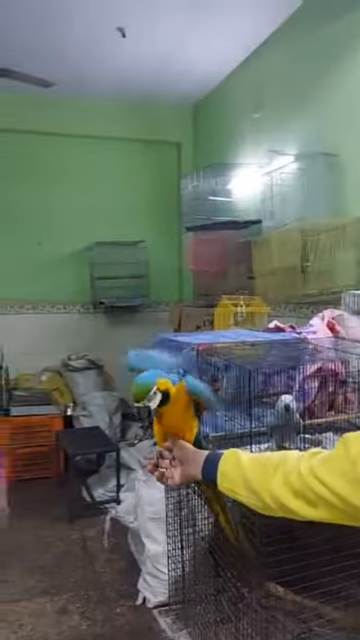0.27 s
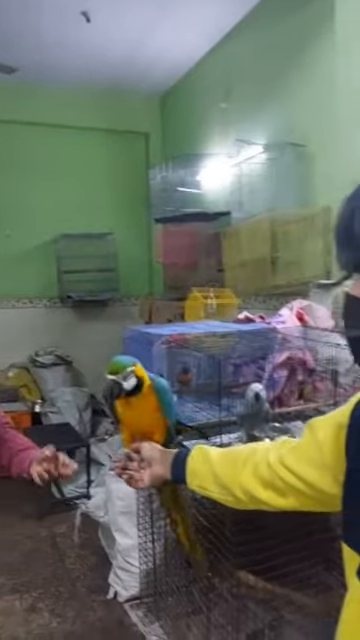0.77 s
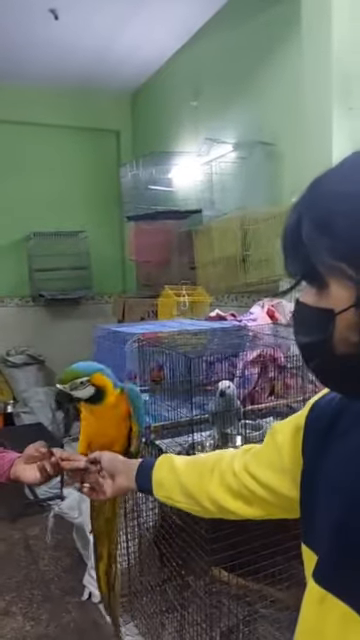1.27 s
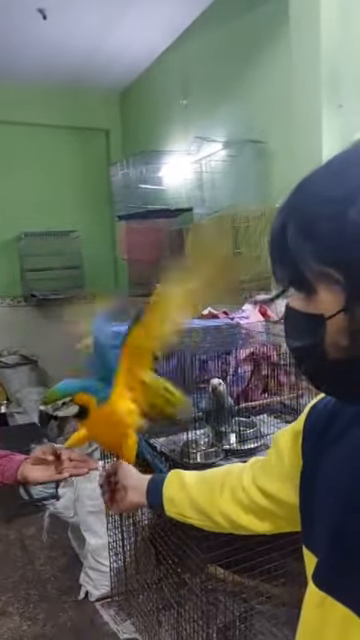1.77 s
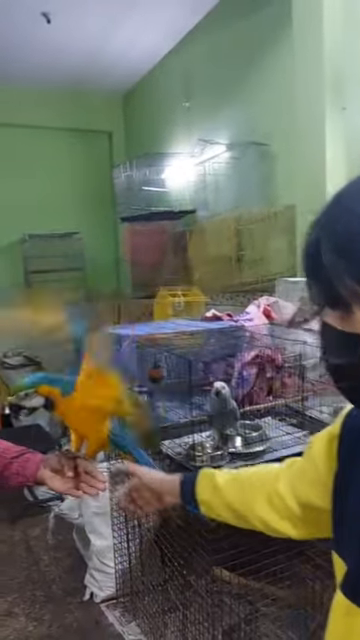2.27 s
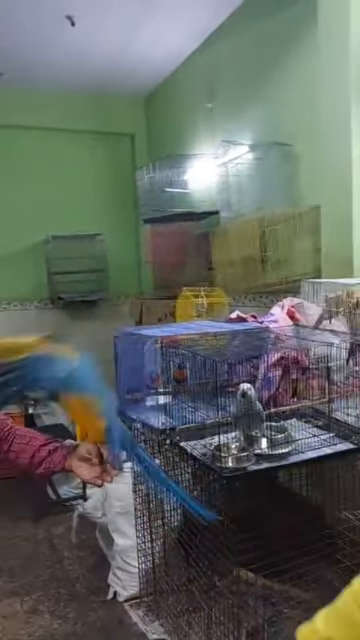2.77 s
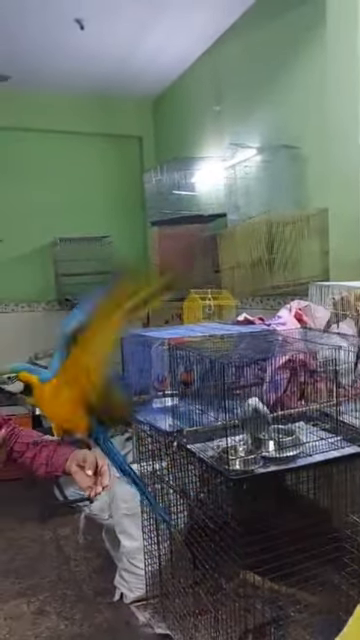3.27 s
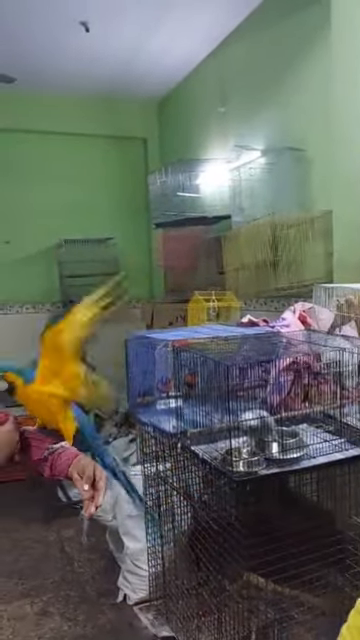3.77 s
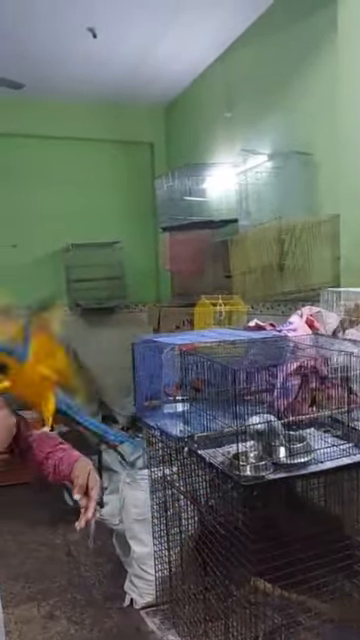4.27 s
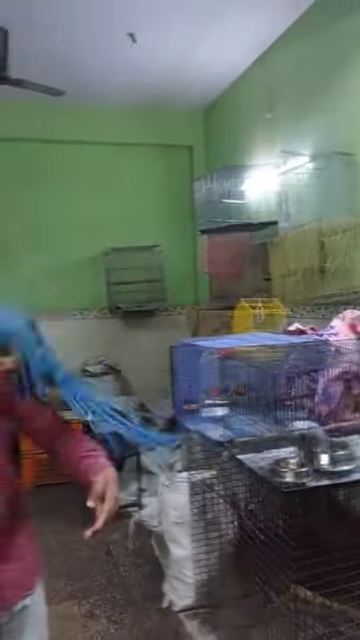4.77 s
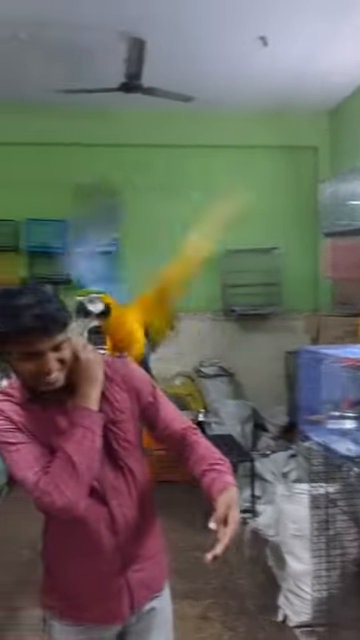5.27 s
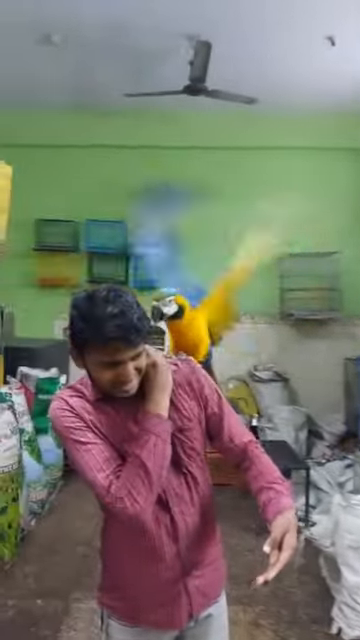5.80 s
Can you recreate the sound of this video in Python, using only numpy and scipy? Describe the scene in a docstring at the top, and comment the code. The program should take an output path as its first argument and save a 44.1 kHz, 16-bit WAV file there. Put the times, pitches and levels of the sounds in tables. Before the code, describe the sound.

A macaw rasps, screeches and squawks between bursts of wing flapping in an echoing shop with a low hum.

```python
"""Over the hum of a hard-walled shop a macaw rasps twice, beats its wings once and screeches twice,
the membranes of its syrinx gliding up in pitch and breaking into irregular vibration. A whine sinks
and frays as the beak closes. The bird then gives a crackling chirp and flaps from hand to shoulder,
each stroke displacing air in a low whoosh with a swish of feathers; claws and cage tick. Last come
runs of squawks over a second bout of flapping, all prolonged by the reverberation of the room."""
import sys
import numpy as np
from scipy import signal
from scipy.fft import rfft, irfft, next_fast_len
from scipy.io import wavfile
from scipy.ndimage import uniform_filter1d

SR = 44100
rng = np.random.default_rng(int(sys.argv[2]) if len(sys.argv) > 2 else 0)


def generate_wav(sig):
    """Save sig (samples, or channels by samples) to the path in sys.argv[1] as 16-bit PCM at SR."""
    pcm = np.round(np.clip(np.atleast_2d(sig).T, -1, 1) * 32767).astype(np.int16)
    wavfile.write(sys.argv[1], SR, pcm)


N = 266143
TIME = np.arange(N) / SR


def gain_of(db):
    return 10 ** (np.asarray(db) / 20)


def unit_rms(x):
    return x / np.sqrt(np.mean(x ** 2) + 1e-20)


def at_frequency(points, hz):
    f, value = np.transpose(points)
    return np.interp(np.log(hz + 1), np.log(f + 1), value)


def add(mix, start, sound):
    part = mix[max(round(start * SR), 0):][:len(sound)]
    part += sound[:len(part)]


def ramp(t, start, end):
    return np.clip((t - start) / max(end - start, 1 / SR), 0, 1)


def swell(centre, db, sigma, t=TIME):
    return gain_of(db) * np.exp(-.5 * ((t - centre) / sigma) ** 2)


def filtered(x, spectrum):
    """Spectral shaping by (f/Hz, level/dB) points, with a roll-off beyond either end."""
    size = next_fast_len(len(x) + 1024)
    hz = np.fft.rfftfreq(size, 1 / SR)
    low_cut = 1 + (spectrum[0][0] / (hz + 1)) ** 4
    high_cut = 1 + (hz / spectrum[-1][0] / 2) ** 4
    response = gain_of(at_frequency(spectrum, hz)) / np.sqrt(low_cut * high_cut)
    return irfft(rfft(x, size) * response, size)[:len(x)]


def noise(spectrum):
    return unit_rms(filtered(rng.standard_normal(N), spectrum))


def wobble(size, hz):
    """Low-pass noise of unit RMS, for random modulation up to about hz."""
    f = np.fft.rfftfreq(SR, 1 / SR)
    return unit_rms(irfft(rfft(rng.standard_normal(SR)) / np.sqrt(1 + (f / hz) ** 4), SR)[:size])


# Spectrum of fans and street (f/Hz, level/dB), and its overall level
HUM, HUM_DB = [(25, -14), (60, -7), (90, 2), (130, -1), (200, -12), (380, -9), (700, -17.5),
               (1200, -23.5)], -54
# Spectrum of the hiss (f/Hz, level/dB), and its rise (t/s, level/dB)
HISS, HISS_RISE = ([(400, 0), (900, -9), (2000, -8), (4000, -18.5), (15500, -20)],
                   [(.7, -79), (1.6, -68.5), (3.5, -57.5)])


def background(dip_at_s=1.5, dip_sigma_s=0.26, dip_db=9.5):
    """Ambient noise: the recorder's gain ducks the hum after the screeches and lets faint hiss rise."""
    hum = gain_of(HUM_DB - dip_db * swell(dip_at_s, 0, dip_sigma_s)) * noise(HUM)
    hiss = gain_of(np.interp(TIME, *np.transpose(HISS_RISE))) * noise(HISS)
    return hum + hiss


def syrinx(hz, rough, jitter=0.0458, shimmer=1.63, subharmonic=0.7, rattle_hz=140, rattle_depth=0.14):
    """Nonlinear oscillation: roughness adds jitter, period doubling and chaos to a harmonic series."""
    rough, size = np.clip(rough, 0, 1), len(hz)
    detuning = rough * (jitter * wobble(size, 330) + 0.02746 * wobble(size, 73))
    phase = 2 * np.pi * np.cumsum(hz * (1 + detuning)) / SR
    tone = np.zeros(size)
    for k in np.arange(2, 29) / 2:
        # unequal alternate cycles put weaker lines halfway between the harmonics
        amplitude = 1 if k % 1 == 0 else subharmonic * rough
        depth = shimmer * rough * min(1, 0.58 + k / 4)  # the fundamental is steadiest
        flutter = 1 + depth * (wobble(size, 190) + 1j * wobble(size, 190))
        partial = flutter * np.exp(1j * (k * phase + rng.uniform(0, 2 * np.pi)))
        tone += amplitude * (k * hz < SR / 2) * partial.real
    tone *= np.sqrt(4 * hz / SR / (1 + 2 * (shimmer * rough) ** 2))
    chaos = unit_rms(rng.standard_normal(size) * (1 + np.cos(phase)))
    flow = np.sqrt(1 - rough ** 4) * tone + rough ** 2 * chaos
    # the membranes slap shut at an uneven rate
    slaps = np.cos(2 * np.pi * np.cumsum(rattle_hz * (1 + 0.295 * wobble(size, 81))) / SR)
    return flow * (1 + rattle_depth * slaps) ** 0.46


def vocal_tract(source, throat, tilt, level_db):
    """Source-filter principle: the throat imposes formants, and a wider beak radiates more treble."""
    size = len(source)
    hz, frame_s, spectra = signal.stft(filtered(source, throat), SR, nperseg=256)
    octaves = np.log2(np.maximum(hz, 800) / 4000)[:, None]
    tilt_db = octaves * np.interp(frame_s, TIME[:size], tilt)
    voice = signal.istft(spectra * gain_of(tilt_db), SR, nperseg=256)[1][:size]
    voice /= np.sqrt(uniform_filter1d(voice ** 2, size=900) + 1e-12)
    return voice * gain_of(level_db) * signal.windows.tukey(size, .04)


def squawk(start, glide, climax, end, peak_db, swell_db, from_hz, top_hz, sag,
           from_rough, top_rough, from_tilt, top_tilt, throat):
    """Coupled modulation: level and treble rise with pitch; then the voice sags and breaks up."""
    t = np.arange(start, end, 1 / SR)
    swelling, release = ramp(t, start, climax), ramp(t, climax, end)
    glide_hz = from_hz + (top_hz - from_hz) * ramp(t, start, start + glide)
    hz = glide_hz * (1 - sag * ramp(t, start + glide, end) ** 1.7)
    octaves_below = np.log2(top_hz / glide_hz)
    attack_db = 20 * np.log10(ramp(t, start, start + 0.24 * glide) + 1e-6)
    level_db = peak_db + attack_db - swell_db * (1 - swelling) - 10.5 * octaves_below - 12 * release
    rough = from_rough + (top_rough - from_rough) * swelling ** 2
    rough += 0.56 * octaves_below + 0.5 * release ** 2
    tilt = from_tilt + (top_tilt - from_tilt) * swelling - 10 * octaves_below
    return vocal_tract(syrinx(hz, rough), throat, tilt, level_db)


# Frequency response of throat and beak for each kind of call: f/Hz, level/dB
RASP_THROAT = [(700, -42), (1250, -8), (1900, -11), (2300, 1), (2800, -2), (3600, -4), (4600, 0),
               (5400, -6), (6400, -10), (7400, -7.5), (8600, -18.5), (10800, -16), (13000, -22),
               (15500, -29.5)]
SCREECH_THROAT = [(700, -20.5), (1400, -9.5), (2100, -6.5), (3300, -1), (3800, -7.5), (4350, 6.5),
                  (4900, -1), (6400, -4), (7400, -4), (8400, -8.5), (9500, -14), (13000, -19), (15300, -21)]
CHIRP_THROAT = [(900, -47), (1700, 3), (2200, 9.5), (2820, 6), (3150, -10), (3800, 1.5), (5300, -11),
                (7700, -20.5), (9800, -31), (15000, -27)]
SQUAWK_THROAT = [(600, -22), (1300, -11), (2250, 4), (2900, -2.5), (4150, 4), (5000, 4), (6100, 3),
                 (8000, 0), (9200, -9.5), (10500, -8.5), (15500, -16)]
LOW_SQUAWK_THROAT = [(600, -27), (1300, -6), (1880, -2.5), (2500, 3.5), (3800, 3.5), (5600, 5.5),
                     (7500, 3.5), (8800, -2.5), (11500, -5.5), (15500, -13)]
# Calls: start t/s, glide duration/s, climax t/s, end t/s, relative climax level/dB, swell/dB,
# start f/Hz, top f/Hz, fractional sag in pitch, roughness at start and at climax,
# spectral tilt/(dB per octave) at start and at climax, throat response
CALLS = [(0, 0.016, 0.012, 0.061, -29.5, -7, 1634, 1674, 0.075, 1.03, 0.78, 3.5, -2, RASP_THROAT),
         (.145, .1, 0.33, .398, -24, 5, 1250, 1869, .09, 0.46, 0.84, -0.5, 0, RASP_THROAT),
         (0.717, 0.05, .814, .84, -15.5, 9.5, 931, 2134, .06, 0.28, 0.23, 3.5, -0.5, SCREECH_THROAT),
         (.974, 0.042, 1.052, 1.078, -14, 10.5, 1193, 2196, 0.049, 0.35, 0.18, 1.5, 1, SCREECH_THROAT),
         (2.05, 0.14, 2.255, 2.385, -30, 6.5, 1546, 2783, 0.31, 0.11, 0.67, 9, -3.5, CHIRP_THROAT),
         (3.615, 0.049, 3.668, 3.685, -43, 9.5, 1594, 2043, 0.019, .6, .55, -6, -4, SQUAWK_THROAT),
         (3.88, .06, 4.02, 4.04, -20.5, 5.5, 1255, 2151, 0.083, 0.56, 0.29, 0, -1, SQUAWK_THROAT),
         (4.03, 0.069, 4.185, 4.207, -18, 8, 1539, 2112, .075, 0.63, 0.28, -3, .5, SQUAWK_THROAT),
         (4.198, 0.0037, 4.225, 4.25, -28, -2, 1753, 1720, 0.038, 0.23, 0.12, 4, 2.5, SQUAWK_THROAT),
         (4.832, 0.022, 4.98, 5.008, -25, 11.5, 1596, 2266, 0.32, 0.59, 0.24, -5, 0, LOW_SQUAWK_THROAT),
         (5.406, .07, 5.51, 5.537, -18, 12.5, 943, 1885, 0.0081, 0.45, .3, -2, -3.5, LOW_SQUAWK_THROAT),
         (5.62, 0.12, 5.767, 5.788, -19, 10.5, 1303, 1914, 0.041, 0.66, 0.29, -2.5, -2.5, LOW_SQUAWK_THROAT)]


def squawks():
    """Superposition of the rasps, screeches, chirp and squawks, each kind with its own formants."""
    out = np.zeros(N)
    for start, *settings in CALLS:
        add(out, start, squawk(start, *settings))
    return out


# Wing strokes: peak t/s, relative level/dB
WING_BEATS = [(.22, -48), (1.919, -45.5), (2.09, -44), (2.265, -40), (2.439, -36), (2.608, -34),
              (2.802, -36.5), (2.983, -37), (3.134, -42.5), (3.759, -41), (3.925, -44), (4.095, -40.5),
              (4.28, -40.5), (4.439, -40), (4.625, -38.5), (4.79, -41.5), (4.937, -36.5), (5.175, -47),
              (5.563, -40), (5.725, -39), (5.905, -41)]
# Spectra of displaced air, feather on feather and feather on cloth: f/Hz, level/dB
WHOOSH = [(25, -34), (55, -15.5), (90, -7), (140, -7), (200, 4.5), (270, -2.5), (350, -9.5), (800, -22.5),
          (3000, -93)]
SWISH = [(300, -10.5), (700, 5.5), (1800, -1.5), (3500, -7.5), (15500, -11)]
CLOTH = [(400, -1.5), (900, -3.5), (1600, 4.5), (2800, -8), (15000, -15.5)]
# Feathers scraping as the wings unfold and the bird climbs: t/s, relative level/dB, sigma/s
FEATHER_SCRAPES = [(1.635, -59.5, 0.12), (4.463, -46.5, 0.044), (4.623, -49, 0.036)]
# Feathers brushing cloth: t/s, relative level/dB, sigma/s
CLOTH_BRUSHES = [(3.305, -50, 0.06), (4.585, -42, .075)]


def wings(rise_s=0.025, fall_s=0.047, swish_db=-17.5, swish_s=0.075, flutter_db=3, crackle_db=4):
    """Turbulence and friction: each stroke sheds a low whoosh; feathers rub on feathers and cloth."""
    push = sum(swell(s, db, np.where(TIME < s, rise_s, fall_s)) for s, db in WING_BEATS)
    slide = sum(swell(s, db + swish_db, swish_s) for s, db in WING_BEATS)
    slide += sum(swell(*row) for row in FEATHER_SCRAPES)
    brush = sum(swell(*row) for row in CLOTH_BRUSHES)
    flutter = unit_rms(gain_of(flutter_db * noise([(10, -10), (45, -23), (120, -63)])))
    crackle = unit_rms(gain_of(crackle_db * noise([(15, -5), (150, -3.5), (900, -60)])))
    return push * flutter * noise(WHOOSH) + crackle * (slide * noise(SWISH) + brush * noise(CLOTH))


# Dry clicks, both rasping cracks in the bird's voice and ticks of claws and cage:
# t/s, relative level/dB, f/Hz, decay time constant/s
CLICKS = [(0.696, -50, 2700, 0.013), (2.109, -46, 8500, 0.0079), (2.297, -38.5, 5800, 0.0075),
          (2.345, -46, 6500, .005), (2.37, -37, 5640, 0.0051), (2.537, -38.5, 2220, 0.0045),
          (2.903, -46, 4460, 0.0063), (3.299, -36, 1485, 0.0016), (3.668, -45.5, 7000, 0.0039),
          (4.42, -38.5, 4240, 0.016), (4.746, -51, 7980, 0.0095)]


def clicks():
    """Damped resonance: each dry click is one broad band of noise that decays exponentially."""
    out, t = np.zeros(N), np.arange(SR // 8) / SR
    for start, db, hz, decay in CLICKS:
        band = [(hz / 2, -10), (hz, 0), (hz * 2, -11)]
        ring = unit_rms(filtered(rng.standard_normal(len(t)), band))
        add(out, start, gain_of(db) * ring * np.exp(-t / decay))
    return out


def beak_resonance(x, hz, width_hz):
    """Cavity resonance of unit gain whose centre follows the curve hz."""
    carrier = np.exp(2j * np.pi * np.cumsum(hz) / SR)
    pole = np.exp(-np.pi * width_hz / SR)
    return 2 * (carrier * signal.lfilter([1 - pole], [1, -pole], x / carrier)).real


# Fundamental of the whine: t/s, f/Hz
WHINE_PITCH = [(1.24, 1233), (1.326, 1000), (1.404, 1033), (1.508, 922), (1.518, 867), (1.54, 906),
               (1.625, 816)]
# Frequency response of throat and beak in the whine: f/Hz, level/dB
WHINE_THROAT = [(600, -5), (930, -3), (1400, -1), (2000, 3), (2900, -2), (4100, 4.5), (6200, -4),
                (7300, -8.5), (9000, -11), (15000, -17)]


def whine(attack_s=0.093, release_s=0.096, gape_at_s=1.408, close_at_s=1.417, fall_hz_per_s=8600):
    """Formant shift: a sinking note flares as the beak gapes; closing it lowers a resonance."""
    times, pitch = np.transpose(WHINE_PITCH)
    start, end = times[0], times[-1]
    t = np.arange(start, end, 1 / SR)
    gape = swell(gape_at_s, 0, 0.017, t)
    closing_s = np.maximum(t - close_at_s, 0)
    held = np.minimum(ramp(t, start, start + attack_s), 1 - ramp(t, end - release_s, end) ** 2)
    level_db = -39.5 - 11 * (1 - held) + 11.5 * gape
    source = syrinx(np.interp(t, times, pitch), rough=0.168 + 1.8 * closing_s)
    voice = vocal_tract(source, WHINE_THROAT, tilt=-2.5 + 3.8 * gape, level_db=level_db)
    formant = beak_resonance(voice, hz=3240 - fall_hz_per_s * closing_s, width_hz=250)
    out = np.zeros(N)
    add(out, start, voice + 3.7 * ramp(t, gape_at_s, close_at_s) * formant)
    return out


# Reverberation time of the shop: f/Hz, T60/s
ROOM_T60 = [(100, 0.75), (400, 1), (1200, 0.66), (4000, 0.62), (8000, 0.5), (15000, 0.44)]
# Early reflections from cages and floor: delay t/s, level/dB
REFLECTIONS = [(.0034, -29.5), (.0071, -13), (0.0146, -9.5)]


def shop(x, wet_db, build_s=0.013):
    """Reverberation: direct sound, early reflections, then a diffuse tail whose treble dies first."""
    taps = rng.choice([-1., 1.], SR) * (rng.random(SR) < .15)
    hz, t, spectra = signal.stft(taps, SR, nperseg=256)
    decay = gain_of(-60 * t / at_frequency(ROOM_T60, hz)[:, None])
    tail = signal.istft(spectra * decay, SR, nperseg=256)[1]
    tail *= 1 - np.exp(-np.arange(len(tail)) / SR / build_s)
    response = gain_of(wet_db) * tail / np.linalg.norm(tail)
    response[0] += 1  # direct sound
    for delay, db in REFLECTIONS:
        add(response, delay * rng.uniform(.9, 1.1), gain_of([db]))
    return signal.fftconvolve(x, response)[:N]


def scene():
    """Superposition of reverberant calls, wings and clicks with ambient noise, in one channel."""
    voice = gain_of(-2.5) * shop(squawks() + whine(), wet_db=-3.5)
    wings_and_clicks = gain_of(-0.5) * shop(wings() + clicks(), wet_db=-4.5)
    return (voice + wings_and_clicks + background())[None]


def record(dry, asymmetry=0.48, cutoff_hz=15800):
    """Quadratic distortion in the microphone puts difference tones under loud calls; then a low-pass."""
    distortion = signal.sosfilt(signal.butter(2, 60, "high", fs=SR, output="sos"), dry ** 2)
    low_pass = signal.firwin(511, cutoff_hz, window=("kaiser", 9), fs=SR)
    return signal.oaconvolve(dry - asymmetry * distortion, low_pass[None], "same")


dry = scene()
out = record(dry)
generate_wav(out)
```